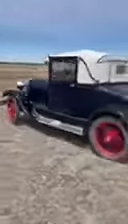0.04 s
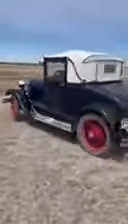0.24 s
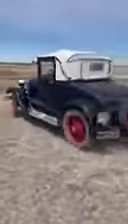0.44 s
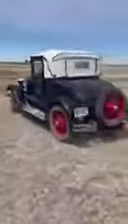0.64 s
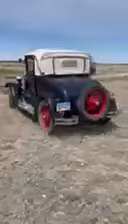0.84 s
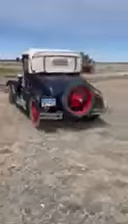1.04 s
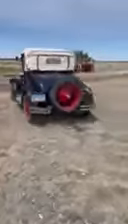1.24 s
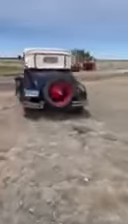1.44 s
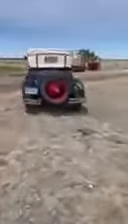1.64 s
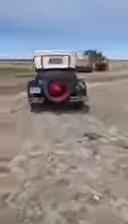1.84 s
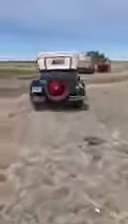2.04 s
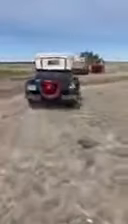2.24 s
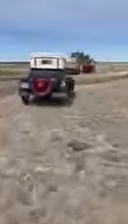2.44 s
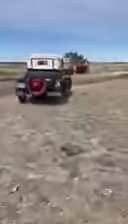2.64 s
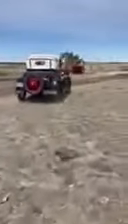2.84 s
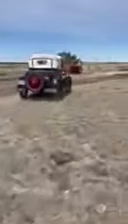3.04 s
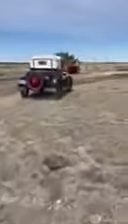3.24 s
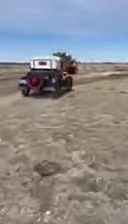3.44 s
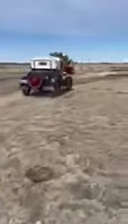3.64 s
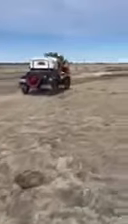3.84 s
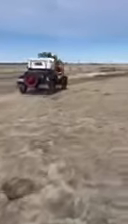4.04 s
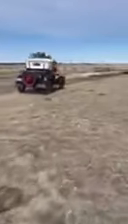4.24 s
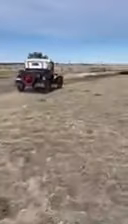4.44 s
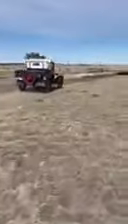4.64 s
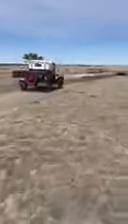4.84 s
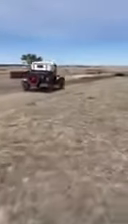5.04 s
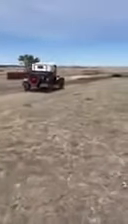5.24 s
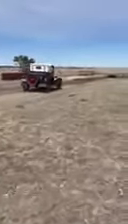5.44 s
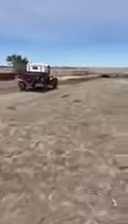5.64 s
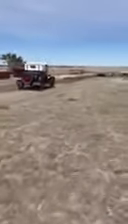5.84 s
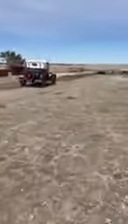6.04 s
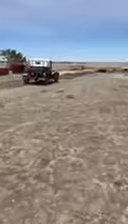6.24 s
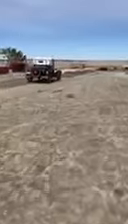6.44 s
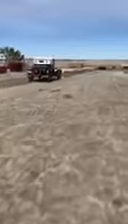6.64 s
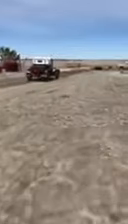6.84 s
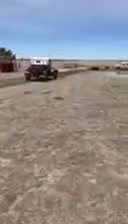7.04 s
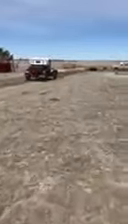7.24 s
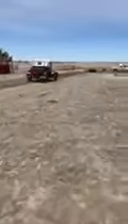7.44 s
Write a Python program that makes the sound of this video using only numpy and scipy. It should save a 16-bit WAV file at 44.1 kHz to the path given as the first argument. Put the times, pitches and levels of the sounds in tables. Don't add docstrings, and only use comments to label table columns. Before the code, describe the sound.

An old four-cylinder car is already running close to a handheld phone on an open dirt lot. Its exhaust fires about 27 times a second, sagging to 23 near 0.9 s, then climbing gradually to about 30 by 6 s. Every firing gives a deep thump, a ringing pipe drone and a short raspy chuff with a thin whistle around 3 kHz. From 0.7 to 1.5 s the engine pulls hardest: chuffs are strong and loose metal panels rattle and knock. Brief gear hums swell from 1.3 to 2.5 s. Tyres rush, with small stone crunches at 0.1, 2.3, 2.8 and scattered later. Heavy low wind bumps hit the microphone at 3.6 and 5.35 s. Rattle and hiss thin with distance, until a softer, steady chug remains at 7.5 s, still running. Dry, no echo.

```python
import sys
import numpy as np
from scipy import signal
from scipy.fft import rfft, irfft, next_fast_len
from scipy.io import wavfile
from scipy.ndimage import uniform_filter1d, minimum_filter1d, map_coordinates

SR = 44100
rng = np.random.default_rng(int(sys.argv[2]) if len(sys.argv) > 2 else 0)


def materialize(psi):
    bounded = np.clip(np.atleast_2d(psi).T, -1, 1)
    quanta = np.round(bounded * 32767).astype(np.int16)
    wavfile.write(sys.argv[1], SR, quanta)


def boost(x):
    u = np.asarray(x, float) / 20
    return 10 ** u


N = 331632
TIME = np.arange(N) / SR


def unit(x):
    return x / np.sqrt(np.mean(x ** 2) + 1e-20)


def curves(rows):
    s, *columns = np.transpose(rows)
    return [np.interp(TIME, s, column) for column in columns]


def wobble(rate):
    knots = rng.standard_normal(int(N * rate / SR) + 4)
    return map_coordinates(knots, [np.arange(N) * rate / SR])


def filtered(x, response):
    size = next_fast_len(N + SR // 2)
    return irfft(rfft(x, size) * response(np.fft.rfftfreq(size, 1 / SR)), size)[:N]


def shape(points):
    f, db = np.transpose(points)
    return lambda hz: boost(np.interp(np.log(hz + 1), np.log(f + 1), db))


def resonant(modes):
    def mode(f, sign, centre, width, db):
        damping = 1j * f * width
        return sign * boost(db) * damping / (centre * centre - f * f + damping)
    return lambda f: sum(mode(f, (-1) ** k, *row) for k, row in enumerate(modes))


def noise(response, patchy_db):
    z = signal.stft(rng.standard_normal(N + 512), nperseg=512)[2]
    field = uniform_filter1d(rng.standard_normal(z.shape), 5, 0)
    field = uniform_filter1d(field, 8, 1)
    patched = signal.istft(z * boost(patchy_db * unit(field)), nperseg=512)[1][:N]
    return unit(filtered(patched, response))


# (time [s], firing rate [1/s])
FIRING_RATE = [(0.0, 27.44), (0.3, 24.83), (0.6, 23.44), (0.9, 23.27), (1.2, 24.29), (1.6, 24.74),
               (2.0, 26.49), (2.4, 25.9), (2.8, 27.36), (3.2, 27.29), (3.7, 28.46), (4.2, 28.7),
               (4.7, 29.22), (5.2, 29.76), (5.8, 30.1), (6.4, 30.28), (7.0, 29.29), (7.52, 29.44)]


def firings():
    return np.cumsum(curves(FIRING_RATE)[0]) / SR + .19


CYLINDER_DB = [0, -1, -2, -2]


def strengths(count, scatter_db):
    k = count.astype(int)
    chance_db = scatter_db * rng.standard_normal(k[-1] + 1)
    return boost(np.array(CYLINDER_DB)[k % 4] + chance_db[k])


def loss_db(s):
    return -20 * np.log10(1 + s / 2.294)


# (time [s], throttle [dB], looseness of the ground under the tyres [dB])
DRIVING = [(0, -1, 1.5), (.1, -3.5, 3), (.4, -0.5, 1.5), (.8, 2, 0), (1.05, 3, 0), (1.25, 0, 1),
           (1.55, 1, -2), (2.15, 1, 1.5), (2.5, 0.5, 0), (2.66, -3.5, -2), (2.92, 1.5, 3.5),
           (3.15, 0.5, -1.5), (3.55, -1, 1.5), (4.0, -1, 0), (4.75, -1, 1.5), (4.93, -1.5, -1),
           (6.95, -1.5, 1.5), (7.52, -3, -1)]
# (level at the start [dB], share of spreading loss, share of throttle, share of looseness)
LAYER_LEVELS = dict(rumble=(-25, 0.61, 1.36, -0.37), drone=(-33, 0.7, -0.07, 0.06),
                roar=(-33.5, 0.82, 0.72, 1.23), leak=(-41.5, 1.68, 1.2, 0), hiss=(-42, 0.8, 0.8, 0.5),
                chuff=(-31, 0.81, 1.67, 0), panels=(-39.5, 2.74, 3.1, 1.1))


def level_db(layer):
    start_db, far, load, loose = LAYER_LEVELS[layer]
    throttle_db, ground_db = curves(DRIVING)
    return start_db + far * loss_db(TIME) + load * throttle_db + loose * ground_db


# (frequency [Hz], level [dB per Hz])
RUMBLE_SPECTRUM = [(12, -48.5), (20, -30), (41, -8.5), (70, -1.5), (92, -2), (135, -12.5), (170, -11.5),
                   (220, -49.5), (370, -120)]
# (frequency [Hz], width [Hz], level [dB])
PIPE_MODES = [(185.06, 20.3, 0), (225, 23.4, -12), (140.6, 27, -10)]


def exhaust():
    rumble_db = level_db("rumble")
    fade_db = loss_db(TIME)
    orders_db = {2: -10.5, 3: -7 - 0.45 * fade_db, 4: -8 + .3 * fade_db}
    count = firings()
    turns = count + 0.052 * wobble(3.6)
    orders = 0
    for order, db in orders_db.items():
        gain = boost(db + 2.5 + 1.5 * wobble(6.3))
        orders = orders + gain * np.sin(2 * np.pi * order * turns)
    throb = 1 + 0.34 * np.cos(2 * np.pi * (count - .55))
    rumble = boost(-2.0) * throb * noise(shape(RUMBLE_SPECTRUM), patchy_db=1.66)

    pulses = np.diff(np.floor(count), prepend=0) * strengths(count, scatter_db=5.0)
    struck = filtered(pulses, resonant(PIPE_MODES))
    struck = unit(filtered(struck, resonant(PIPE_MODES)))
    drone = 0.74 * struck + 0.62 * noise(resonant(PIPE_MODES), patchy_db=3.9)
    return boost(rumble_db) * (orders + rumble) + boost(level_db("drone") - 0.5) * drone


# (frequency [Hz], width [Hz], level [dB])
JOINT_MODES = [(1093, 150, -7), (1440, 140, -12.5), (1740, 33, -6), (2067, 110, -5), (2130, 40, -4),
               (3300, 107, 3.5), (3566, 190, -2), (3820, 32, 6.5), (4314, 140, -8.5), (5020, 440, -9.5),
               (8100, 730, -17.5), (8950, 170, -11.5)]
# (frequency [Hz], level [dB per Hz])
ROAR_SPECTRUM = [(120, -21), (200, -2), (264, -7), (477, -7.5), (527, -8), (691, -17), (959, -21.5),
                 (1160, -19.5), (1280, -26.5), (1500, -19), (1950, -51.5), (3300, -120)]
# (frequency [Hz], level [dB per Hz])
HISS_SPECTRUM = [(590, -32), (1000, 0), (1230, -6.5), (2210, -1.5), (2480, -5.5), (2870, -9), (3220, -5),
                 (4070, -6), (4440, -9), (5180, -11.5), (5820, -57.5), (6290, -18.5), (6730, -13.5),
                 (9530, -26.5), (10100, -51), (13100, -75), (22000, -120)]


def leak():
    roar_db, leak_db, hiss_db = map(level_db, ("roar", "leak", "hiss"))
    count = firings()
    phase = count % 1
    puff = (1 - np.exp(-phase / 0.045)) * np.exp(-phase / 0.67)
    puff = unit(puff * strengths(count, scatter_db=1.5))
    gas = puff * noise(resonant(JOINT_MODES), patchy_db=4.5)
    gusts = boost(0.71 * wobble(12))
    roar = (1 + 0.066 * puff) * gusts * noise(shape(ROAR_SPECTRUM), patchy_db=2.0)
    hiss = (0.7 + 0.31 * puff) * noise(shape(HISS_SPECTRUM), patchy_db=4.06)
    return boost(leak_db - 5.5) * gas + boost(hiss_db - 1.5) * hiss + boost(roar_db + 0.5) * roar


# (time [s], frequency [Hz], level [dB])
GEAR_HUMS = [
    [(1.2, 435, -84), (1.42, 440, -33.5), (1.8, 445.7, -39), (2.15, 440, -73)],
    [(1.25, 535, -72), (1.6, 522, -37.5), (2.0, 535, -45.5), (2.35, 534, -32.5), (2.62, 536, -69)],
    [(1.1, 365, -80), (1.35, 367, -35), (1.6, 372, -45), (1.85, 375, -80)],
    [(1.2, 290, -85), (1.4, 292, -41.5), (1.7, 296, -39.5), (1.9, 298, -80.5)],
    [(0, 183, -38.5), (2.2, 190, -48), (4.2, 186, -46.5), (6.5, 189, -43.5), (7.52, 184, -49.5)],
]


def gears():
    hums = 0
    for hz, db in map(curves, GEAR_HUMS):
        gain = boost(db - 1.5 + 3.3 * wobble(25))
        hums = hums + gain * np.sin(2 * np.pi * np.cumsum(hz + 4 * wobble(20)) / SR)
    return hums


# (time [s], peak level [dB], whistle [Hz], upper whistle [dB])
STRONG_CHUFFS = [(0.219, -33, 3340, -14), (0.4658, -32, 3280, -5), (0.8055, -32, 3880, -3),
                 (0.8894, -33, 3570, -22), (1.0186, -33, 3240, -8), (1.1008, -32, 3460, 0.5),
                 (1.1438, -28, 3390, -9.5), (1.1827, -29, 3380, -16), (1.3086, -29, 3810, -11),
                 (1.3494, -32.5, 3820, -16), (1.6717, -31.5, 3150, -15), (1.7913, -35, 3300, 0),
                 (2.0992, -35.5, 3310, -37), (2.3645, -32.5, 3470, -20), (2.52, -32.5, 2930, -15),
                 (2.9652, -36.5, 3310, -23), (3.2918, -38, 3180, -15), (3.5468, -36, 3820, -23),
                 (3.8258, -38, 3160, -14), (3.896, -39.5, 3170, -28), (4.2433, -37.5, 3300, -7.5),
                 (4.4886, -36, 3180, -3.5), (4.5236, -34.5, 3170, -11), (5.0694, -38, 3830, -8),
                 (5.204, -37, 3180, -7), (5.7347, -37.5, 3090, -6), (6.6675, -35.5, 3470, -8),
                 (6.8, -41.5, 3440, -2), (7.1732, -33.5, 3330, -13), (7.344, -41, 3510, -5)]
# (delay [firing gaps], whistle [dB], upper whistle [dB], lower ring [dB])
VALVE_PUFFS = [(.06, 4, -12.5, -8), (-.02, 2, -20, -6.5), (0.082, 0, -16, -21.5), (-.01, 3, -10.5, -2)]
WHISTLE_PITCHES = [3180, 3085, 3170, 3310, 3320, 3810, 3330]


def puffs():
    count = firings()
    k = np.arange(1, int(count[-1]))
    late, main_db, upper_db, lower_db = np.transpose(VALVE_PUFFS)[:, k % 4]
    r = rng.standard_normal((len(k), 6))
    s = np.interp(k + late + 0.027 * r[:, 4], count, TIME)
    db = level_db("chuff")[(s * SR).astype(int)] + main_db
    choices = np.where(s > 2.6, 4, len(WHISTLE_PITCHES))
    hz = np.array(WHISTLE_PITCHES)[(abs(r[:, 5]) * 977).astype(int) % choices]
    mix_db = np.array([db, upper_db, lower_db + 0.73 * loss_db(s), -30 + 0 * s])
    scatter_db = (1.1, 7.6, 1.7, 9.3)
    mix_db = mix_db + (r[:, :4].clip(-3, 1) * scatter_db).T
    rows = np.array([s, mix_db[0], hz, *mix_db[1:]]).T
    for strong_s, strong_db, strong_hz, strong_upper_db in STRONG_CHUFFS:
        j = np.argmin(abs(s - strong_s))
        rows[j, :4] = strong_s, strong_db + 7.5, strong_hz, strong_upper_db
        rows[j, 4:] -= 4.5
    return rows


def chuffs():
    out, t = np.zeros(N + SR), np.arange(SR // 20) / SR
    rings_hz = np.array([1456, 1768, 2070, 2254])
    fizz = noise(shape([(5900, -66.0), (6600, -8.0), (8500, 4.0), (8900, -31.0), (9400, 7.0), (10000, -38)]),
                 patchy_db=0.5)
    spit = noise(shape([(1200, -41.5), (1900, -4), (3300, 0.0), (4600, -12), (5400, -8.5), (6500, -44)]),
                 patchy_db=2.5)
    shiver = wobble(450)
    swell = (1 - np.exp(-t / 0.0048)) ** 2 * np.exp(-t / 0.0083) * 2.09
    glide = t + 0.046 * 0.0079 * (1 - np.exp(-t / 0.0089))
    rows = puffs()
    chance = rng.standard_normal((len(rows), 8))
    for (s, db, hz, upper_db, lower_db, fizz_db), r in zip(rows, chance):
        def tone(f):
            start = round(f * 9 + s * SR) % (N - len(t))
            jitter = .45 * shiver[start:][:len(t)]
            return np.sin(2 * np.pi * f * glide + 9 * r[2] + jitter)

        flutter = 1 + 0.25 * np.sin(2 * np.pi * (170 + 40 * r[0]) * t + 3 * r[1])
        lower = sum(boost(6.1 * min(g, 1) - 6.5) * tone(f) for f, g in zip(rings_hz, r[4:]))
        i = max(round((s - .003) * SR), 0)
        span = slice(i, i + len(t))
        burst = boost(-7.5) * tone(hz * .99) + boost(upper_db) * tone(4380 + 40 * r[3])
        burst = burst + boost(lower_db + 1.0) * lower
        burst = burst + boost(-17 + 1.3 * r[1]) * np.resize(spit[span], len(t))
        jet = boost(fizz_db - 4) * np.resize(fizz[span], len(t))
        out[span] += boost(db) * swell * (flutter * burst + jet)
    return out[:N]


# (frequency [Hz], width [Hz], level [dB])
PANEL_MODES = [(720, 130, -5), (795.4, 14, 2), (950, 63, 1.5), (1090, 15, -2), (1202, 22, 0), (1356, 28, 6),
               (1518, 20, -3.5), (1727, 8.8, 4), (1934, 16, 6.5), (2105, 9.3, 2), (2323, 13, -17.5)]
# (time [s], level [dB], frequency [Hz])
PANEL_KNOCKS = [(.72, -32.5, 2050), (0.809, -29, 1216), (.891, -28, 2075), (.92, -30, 800),
                (1.145, -31.5, 790), (1.428, -29, 2070), (1.713, -42, 1145), (2.06, -34.5, 2054),
                (2.135, -39, 1964), (2.365, -37, 2260), (2.44, -38, 1530), (5.113, -41, 993),
                (7.172, -43.5, 1530)]


def panels():
    count = firings()
    k, struck = count.astype(int), np.diff(np.floor(count), prepend=0)
    share = rng.standard_normal((k[-1] + 1, len(PANEL_MODES)))
    share = uniform_filter1d(share, size=3, axis=0).clip(-2, .9)
    rings = 0
    for (hz, width_hz, db), g in zip(PANEL_MODES, share.T):
        keep = np.exp(-np.pi * width_hz / SR)
        turn = 2 * np.pi * hz / SR
        poles = [1, -2 * keep * np.cos(turn), keep ** 2]
        rings = rings + signal.lfilter([np.sin(turn)], poles, struck * boost(db + 11 * g[k]))
    out = np.pad(boost(level_db("panels")) * unit(rings), (0, SR))
    t = np.arange(SR // 10) / SR
    envelope = (1 - np.exp(-t / 0.0023)) * np.exp(-t / 0.01)
    for s, db, hz in PANEL_KNOCKS:
        out[round(s * SR):][:len(t)] += boost(db + 6.0) * envelope * np.sin(2 * np.pi * hz * t)
    return out[:N]


# (time [s], level [dB], length [s])
STONE_CRUSHES = [(0.109, -37.5, 0.031), (0.811, -40.5, 0.022), (1.27, -44, 0.017), (1.443, -59, 0.011),
                 (2.256, -36, 0.017), (2.529, -44, 0.027), (2.826, -37, 0.026), (2.885, -41, 0.0097),
                 (3.455, -51, 0.013), (3.564, -51, 0.011), (3.739, -55, 0.0078), (5.748, -51, .012),
                 (4.055, -42.5, 0.022), (4.24, -43, 0.032), (4.523, -42.5, 0.013), (4.659, -48.5, .015),
                 (4.795, -50, 0.023), (4.969, -56, 0.018), (7.076, -47, 0.013), (5.071, -41.5, 0.022),
                 (6.002, -44, .015), (6.409, -46, 0.021), (7.276, -47.5, 0.017)]
# (frequency [Hz], level [dB per Hz])
STONE_SPECTRUM = [(300, -27), (700, 6.5), (2300, 0.5), (5000, -7), (7000, -8.5), (9600, -19.5),
                  (11000, -45)]


def stones():
    swell = 0
    for s, db, length in STONE_CRUSHES:
        swell = swell + boost(db) * np.exp(-((TIME - s - length / 2) / length * 2) ** 2)
    cracks = rng.standard_normal(N) * (0.42 + (rng.random(N) < .03) * 2.6)
    return swell * unit(filtered(cracks, shape(STONE_SPECTRUM)))


# (time [s], peak level [dB], frequency [Hz], decay by 60 dB [s])
WIND_BUMPS = [
    (3.628, -4.5, 105, 0.054),
    (3.642, -2, 74, 0.05),
    (5.346, -6, 63.4, 0.18),
    (5.349, -23, 147, 0.16),
    (5.351, -23, 214, 0.14),
    (5.354, -32, 279, .08),
    (5.439, -20, 70.5, 0.2),
]


def wind():
    out, t = np.zeros(N + SR), np.arange(SR // 4) / SR
    onset = 1 - np.exp(-t / 0.0086)
    glide = t + 0.005 * (1 - np.exp(-t / 0.0055))
    for s, db, hz, t60 in WIND_BUMPS:
        out[round(s * SR):][:len(t)] -= boost(db - 60 * t / t60) * onset * np.sin(2 * np.pi * hz * glide)
    return out[:N]


def scene():
    return (exhaust() + leak() + chuffs() + panels() + stones() + gears() + wind())[None]


def thinned(x):
    hz, _, z = signal.stft(x, SR, nperseg=1024)
    power = uniform_filter1d(abs(z) ** 2, size=4, axis=0)
    power = uniform_filter1d(power, size=9, axis=1)
    loudest = -minimum_filter1d(-power, size=25, axis=0)
    audible = power > loudest * boost(-2 * 16.5)
    outside = (hz < 1150) | (hz > 7000)
    return signal.istft(z * (audible | outside[:, None]), SR, nperseg=1024)[1][:N]


def band_limit(x):
    return signal.sosfilt(signal.butter(12, 10250, fs=SR, output="sos"), x)


def record(dry):
    colour = shape([(20, 0.5), (2430, 0.0), (2620, -6), (2830, 0.5), (5300, -1.0), (5650, -8.5), (5900, -53),
                    (6150, -7), (6500, -4.5), (8600, 1.0), (8820, -14.5), (9050, 1.5), (9700, 1.0),
                    (10250, -31.5), (10400, -93)])
    mix = thinned(filtered(dry[0], colour))[None]
    return band_limit(mix)


dry = scene()
out = record(dry)
materialize(out)
```